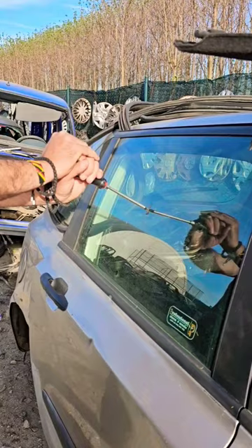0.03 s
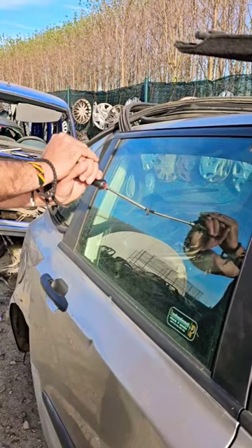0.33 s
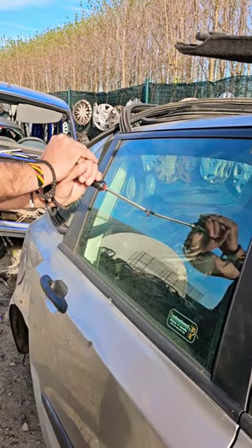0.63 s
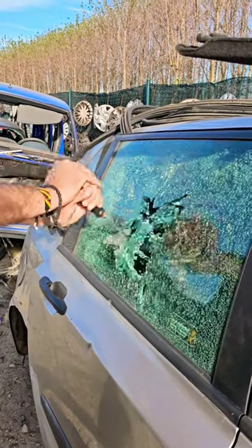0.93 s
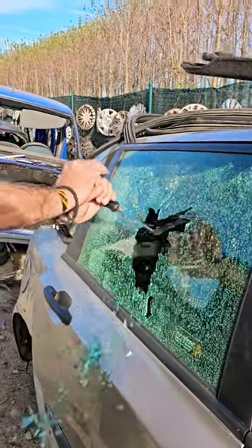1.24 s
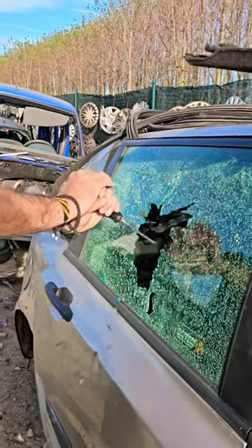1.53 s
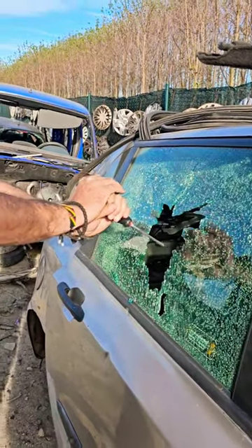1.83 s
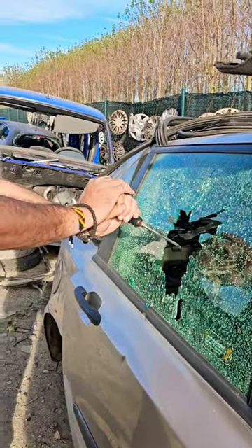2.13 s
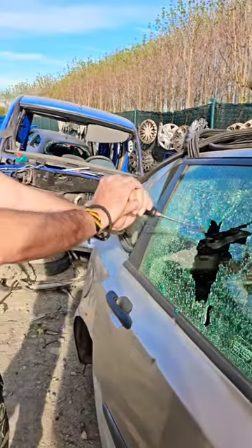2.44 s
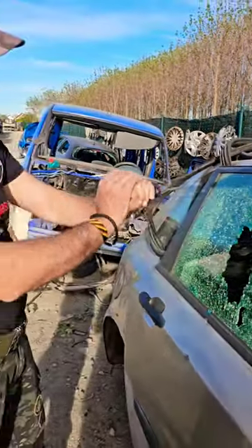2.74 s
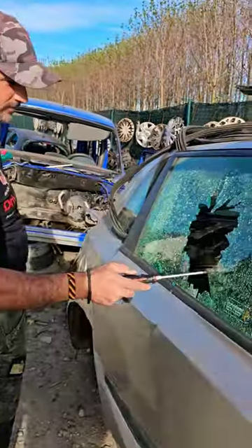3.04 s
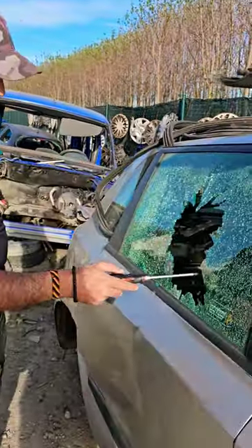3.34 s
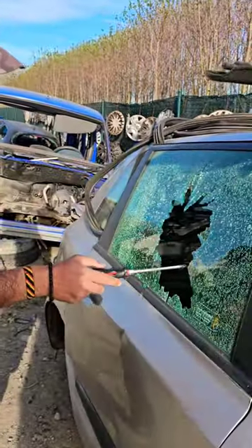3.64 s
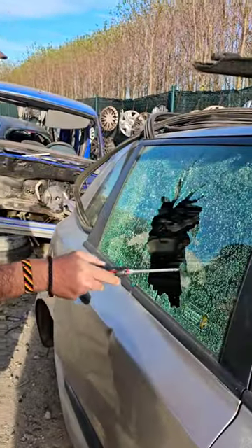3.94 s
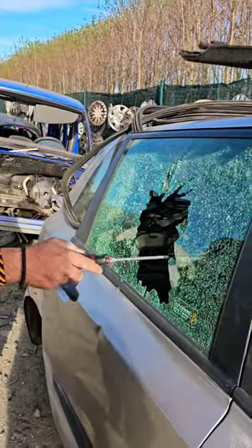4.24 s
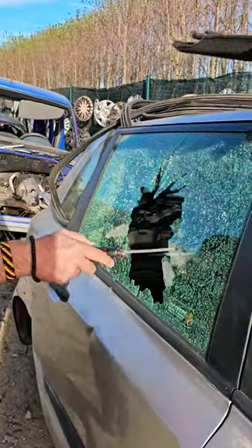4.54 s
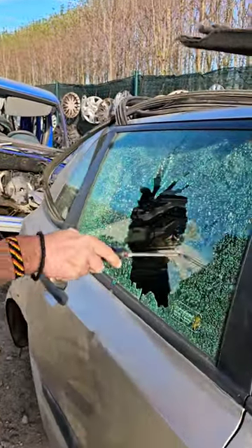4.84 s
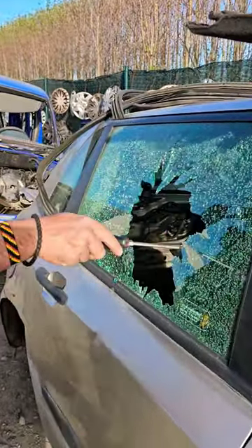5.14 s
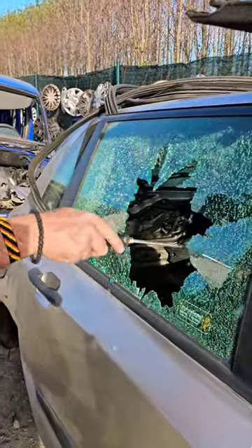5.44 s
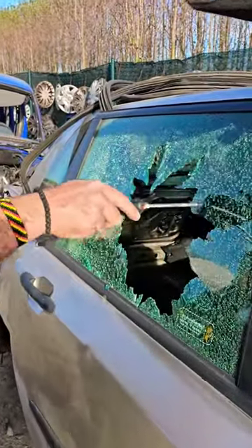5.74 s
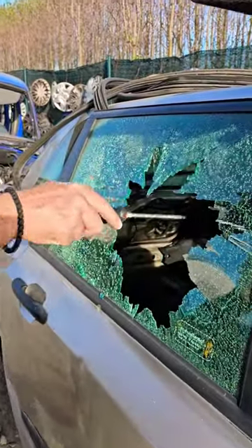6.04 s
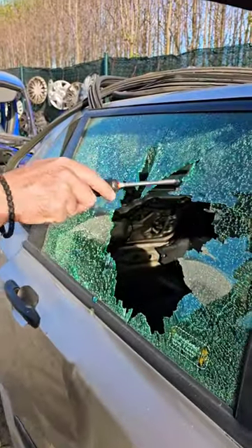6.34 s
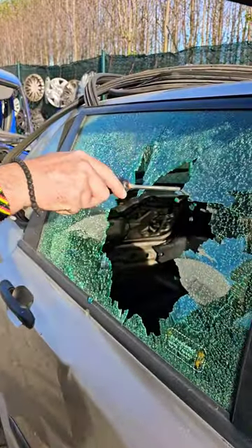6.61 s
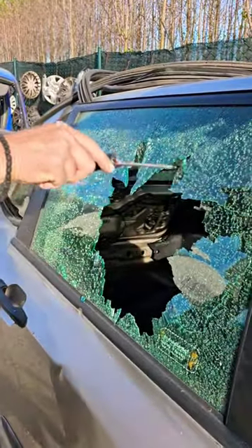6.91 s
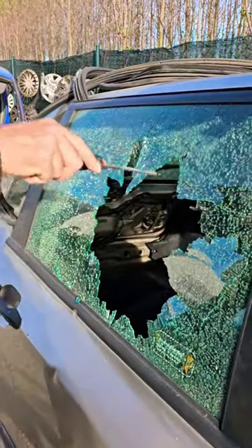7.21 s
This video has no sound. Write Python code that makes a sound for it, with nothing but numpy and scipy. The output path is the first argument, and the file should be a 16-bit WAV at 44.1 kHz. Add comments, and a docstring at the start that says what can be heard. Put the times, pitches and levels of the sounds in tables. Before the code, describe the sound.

Light wind rumbles on the microphone over a faint scrapyard hum. Close by, a car window suddenly cracks apart, the door rings dully and a rush of glass crumbs spills down, ending in a few bright ticks. The sound cuts out for an instant and pops back. A screwdriver then jabs repeatedly at the remaining glass, which snaps, crunches and trickles inside with small clunks.

```python
"""A car's toughened side window bursts under a screwdriver, outdoors in a humming scrapyard.
The pane's stored stress is released in one crack that sets the door's modes ringing, and crumbs of
glass pour down the door. The blade then pokes out more of the crazed pane: it clacks and snaps,
patches crunch loose, and chunks drop into the car. A light wind rumbles on the microphone.
The sound drops out once, briefly, and returns with a pop."""
import sys
import numpy as np
from scipy import signal
from scipy.fft import rfft, irfft
from scipy.io import wavfile
from scipy.ndimage import uniform_filter1d

SR = 44100
rng = np.random.default_rng(int(sys.argv[2]) if len(sys.argv) > 2 else 0)


def persist_wave(psi):
    """Save psi, clipped to +-1, as 16-bit WAV."""
    counts = np.round(np.clip(psi, -1, 1) * 32767).astype(np.int16)
    wavfile.write(sys.argv[1], SR, np.atleast_2d(counts).T)


N = 329427
T = np.arange(N) / SR
BURST_S = 0.8947
FLOW_RISE_S = 0.0092  # a shower of crumbs builds up this fast

# the blade pokes the pane: (time [s], clack level [dB], clack pitch [Hz], snap level [dB], snap pitch [Hz])
POKES = [(0.4986, -62, 1500, -52.5, 6210), (2.611, -38, 1250, -63, 4020), (3.15, -38.5, 1360, -63, 4000),
         (3.329, -28, 1042, -22, 4430), (3.806, -18, 1820, -35, 4000), (4.011, -25.5, 1406, -14.5, 6360),
         (4.568, -16.5, 1362, -18, 11570), (4.82, -23, 1420, -48, 3980), (4.9745, -12.5, 1320, -14, 7080),
         (5.264, -25.5, 1290, -39, 5940), (5.371, -18.5, 2642, -14, 11600), (5.913, -19, 1030, -14.5, 6100),
         (6.197, -29, 1306, -33, 13400), (6.345, -22, 1000, -47, 3984), (6.408, -11, 1580, -17, 4575),
         (7.098, -27, 1390, -18, 3830)]
# patches tear loose: (time [s], duration [s], crackle level [dB], grinding level [dB], upper cutoff [Hz])
CRUNCHES = [(0.883, 0.069, -30.5, -31, 16000), (0.947, 0.015, -24, -35, 16000),
            (0.984, 0.016, -12, -13.5, 13200), (1.005, 0.033, -16, -15, 13400),
            (1.097, 0.11, -17, -28.5, 11800), (1.128, 0.03, -27, -18.5, 14000),
            (1.59, 0.0085, -21.5, -25.5, 14900), (1.609, 0.043, -25.5, -61, 14100),
            (3.329, 0.046, -45, -50, 15000), (3.763, .023, -44, -48, 14100),
            (3.804, 0.029, -22.5, -25.5, 5200), (4.011, 0.047, -27, -34.5, 14800),
            (4.561, .027, -24, -38, 14600), (4.97, 0.051, -20, -30.5, 15960),
            (5.26, .012, -36, -35.5, 11900), (5.305, 0.018, -35.5, -43, 14600),
            (5.365, 0.014, -29.5, -27.5, 16000), (5.383, 0.054, -23.5, -32.5, 16000),
            (5.651, 0.011, -34.5, -56, 15000), (5.91, 0.05, -30, -35, 16000),
            (6.012, 0.023, -26.5, -35, 11200), (6.221, 0.014, -26, -26, 6000),
            (6.406, 0.013, -29, -15.5, 5800), (6.587, 0.098, -33, -41, 14900),
            (7.097, .023, -31, -31.5, 8100)]
# chunks land on the trim: (time [s], level [dB], pitch [Hz])
CHUNKS = [(1.292, -22.5, 560), (1.385, -20.5, 901), (1.455, -24, 676), (1.686, -22, 650), (1.795, -34, 790),
          (2.145, -39.5, 639), (2.715, -43, 576), (3.573, -37.5, 584), (4.46, -33.5, 676),
          (4.497, -28.5, 900), (4.734, -36, 593.4), (5.119, -26.5, 560), (5.287, -26, 537),
          (5.561, -26.5, 1050), (5.601, -36, 1170), (5.79, -34, 830), (5.83, -25, 759), (5.949, -13.5, 757),
          (6.134, -33.5, 750), (6.373, -27, 660), (6.61, -32, 418), (6.995, -31.5, 807),
          (7.024, -24.5, 670), (7.087, -31.5, 660), (7.283, -42, 1210)]
# spectrum of tinkling glass: (frequency [Hz], level [dB])
TINKLE_SPECTRUM = [(1060, -30.5), (1800, -1), (2010, -4.5), (2740, -2.5), (3950, -5.5), (4330, -2.5),
                   (6710, -4.5), (7290, 0.5), (10500, -15), (11500, -1), (13600, -8.5), (14900, -2.5),
                   (16000, -15.5)]


def from_db(db):
    """Decibels to amplitude ratio."""
    return 10 ** (np.asarray(db) / 20)


def rms_one(x):
    """Normalise to rms 1."""
    return x / np.sqrt(np.mean(x ** 2) + 1e-20)


def envelope(rows):
    """Gain interpolated through (time [s], level [dB]) points, silent outside their span."""
    return from_db(np.interp(T, *np.transpose(rows), left=-120, right=-120))


def add(out, s, sound):
    """Superpose a sound at time s."""
    at = int(round(s * SR))
    out[:, at:at + sound.shape[-1]] += sound[..., :N - at]


def swell(s, hold_s, rise_s, fall_s):
    """An envelope that rises at time s, holds and decays exponentially."""
    out, t = np.zeros((1, N)), T[:SR]
    add(out, s, (1 - np.exp(-t / rise_s)) * np.exp(-np.maximum(t - hold_s, 0) / fall_s))
    return out[0]


def cut(x, hz, kind):
    """Two-pole Butterworth low-pass or high-pass."""
    return signal.sosfilt(signal.butter(2, np.clip(hz, 20, .45 * SR), kind, fs=SR, output="sos"), x)


def coloured(x, spectrum, size=4096):
    """Minimum-phase filter with the given spectrum; white noise keeps its power."""
    hz, db = np.transpose(spectrum)
    log_f = np.log(np.maximum(np.fft.rfftfreq(size, 1 / SR), 1))
    beyond = np.maximum(np.log(hz[0]) - log_f, 0) + np.maximum(log_f - np.log(hz[-1]), 0)
    magnitude = from_db(np.interp(log_f, np.log(hz), db) - 20 * beyond)
    cepstrum = irfft(np.log(magnitude))
    cepstrum[1:size // 2] *= 2  # folding the cepstrum makes the filter causal
    cepstrum[size // 2 + 1:] = 0
    response = irfft(np.exp(rfft(cepstrum)))
    return signal.fftconvolve(x, response[None] / np.linalg.norm(response), axes=1)[:, :x.shape[1]]


def resonance(x, hz, width_hz):
    """Two-pole resonator with unit peak gain."""
    r = np.exp(-np.pi * width_hz / SR)
    gain = (1 - r * r) / 2
    return signal.lfilter([gain, 0, -gain], [1, -2 * r * np.cos(2 * np.pi * hz / SR), r * r], x + 1e-18)


def ring(hz, t60):
    """Free vibration of one damped mode."""
    t = T[:SR // 2]
    return np.sin(2 * np.pi * hz * t) * from_db(-60 * t / t60)


def stereo_noise(count, apart):
    """Partly coherent white noise; apart is the ratio of side to mid."""
    mid, side = rng.standard_normal((2, count))
    return mid + apart * side * [[1], [-1]]


def air(spectrum, apart):
    """Stationary coloured noise of rms 1."""
    return rms_one(coloured(stereo_noise(N, apart), spectrum))


def lurches(spread_db, size):
    """Log-normal amplitude modulation, smoothed over size samples."""
    drift = uniform_filter1d(uniform_filter1d(rng.standard_normal(N), size), size)
    return from_db(spread_db * rms_one(drift))


def evened(x, size=1500):
    """Hold the running rms near 1; the fine grain stays."""
    power = np.maximum(uniform_filter1d(np.mean(x ** 2, axis=0), size), 0)
    return x / np.sqrt(power + 1e-3 * np.mean(x ** 2))


def contacts(per_s, spread_db, lag_s=.0003):
    """A Poisson stream of uneven impulses, each placed by level and delay between the channels."""
    at = np.flatnonzero(rng.random(N) < per_s / SR)
    size = from_db(spread_db * np.minimum(rng.exponential(1, len(at)), 4)) * rng.choice([-1, 1], len(at))
    pan_db = rng.normal(0, 2, len(at))
    lag = (rng.normal(0, lag_s, len(at)) * SR).astype(int)
    out = np.zeros((2, N))
    out[0, at] = size * from_db(pan_db)
    out[1, np.clip(at + lag, 0, N - 1)] = size * from_db(-pan_db)
    return out


def door_echo(x, share):
    """Comb filtering: a reflection off the door skin interferes with the direct sound."""
    lags = (rng.uniform(.0003, .0016, 2) * SR).astype(int)
    echo = np.array([np.pad(side, (lag, 0))[:len(side)] for side, lag in zip(x, lags)])
    return (x + share * echo) / np.hypot(1, share)


def blow(hz, t60, breadth, apart):
    """An impact excites a crowd of damped modes around one pitch; peak 1."""
    t = T[:SR // 5]
    modes = stereo_noise(len(t), apart) * from_db(-60 * t / t60)
    modes = resonance(resonance(modes, hz, breadth * hz), hz, 2 * breadth * hz)
    return modes / np.abs(modes).max()


def fracture(hz, decay_s, breadth, low_hz):
    """Brittle fracture: a sharp onset and a short shiver of the surrounding glass; peak +2 dB."""
    t = T[:SR // 12]
    decay = np.exp(-t / decay_s) + from_db(-27) * np.exp(-t / .005)
    shiver = resonance(rng.standard_normal((2, len(t))) * decay, hz, breadth * hz)
    snap = door_echo(cut(shiver, low_hz, "high"), share=.17)
    return from_db(2) * snap / np.abs(snap).max(axis=1, keepdims=True)


def wind():
    """Turbulent pressure buffets the microphone; the door heaves at the burst and adds its own puff."""
    # strength of the breeze: (time [s], level [dB])
    strength = [(0.13, -42), (0.6, -36.5), (1.5, -40), (2.1, -46.5), (2.6, -41.5), (3.9, -37),
                (4.75, -43.5), (5.6, -39), (6.3, -46), (7.47, -39)]
    # the strongest gusts: (time [s], level [dB])
    gusts = [(0.64, -32.5), (1.44, -32), (2.48, -36.5), (2.72, -35), (3.11, -36.5), (3.49, -33), (3.7, -34),
             (4.13, -34), (4.42, -32.5), (4.87, -31), (5.12, -29.5), (5.46, -29.5), (6.66, -31.5),
             (7.38, -28)]
    # spectrum of the turbulence: (frequency [Hz], level [dB])
    spectrum = [(15, -1.5), (30, -6), (50, 4), (80, 0.5), (110, -5), (160, -15), (250, -23.5), (400, -35),
                (800, -49)]
    breeze = envelope(strength) * lurches(3, size=int(.027 * SR))
    puffs = sum(from_db(db) * swell(s, hold_s=.045, rise_s=.0089, fall_s=.039) for s, db in gusts)
    heave = from_db(-24.5) * swell(BURST_S, hold_s=.11, rise_s=.005, fall_s=.034)
    return np.hypot(breeze, puffs + heave) * evened(air(spectrum, apart=.38), size=3000)


def yard():
    """Ambient noise: the far, steady hum of the yard."""
    # spectrum of the hum: (frequency [Hz], level [dB])
    spectrum = [(100, -3), (300, 1), (600, -3), (1200, -13.5), (2200, -29), (4000, -37), (7500, -37.5),
                (10000, -48), (16000, -45)]
    return from_db(-61) * air(spectrum, apart=.84)


def blade_pokes():
    """Each poke is a heavily damped impact, a dry clack, with a brittle snap in the pane."""
    out = np.zeros((2, N))
    for s, clack_db, clack_hz, snap_db, snap_hz in POKES:
        clack = cut(blow(clack_hz, t60=.01, breadth=.67, apart=.71), 1963, "low")
        add(out, s, from_db(clack_db + 3) * clack)
        add(out, s, from_db(snap_db) * fracture(snap_hz, decay_s=.0021, breadth=.7, low_hz=900))
    return out


def door_thuds(rise_s=.008, fall_s=.035):
    """Forced response: the hollow door answers each crunch and fallen chunk with a dull thud."""
    # spectrum of a thud: (frequency [Hz], level [dB])
    spectrum = [(50, -8.5), (85, -1), (130, 0), (200, -2), (280, -4), (420, -17)]
    shoves = [from_db(db - 17.5) * swell(s, length, rise_s, fall_s) for s, length, db, _, _ in CRUNCHES]
    falls = [from_db(db - 17) * swell(s, 0, rise_s, fall_s) for s, db, _ in CHUNKS]
    return sum(shoves + falls) * evened(air(spectrum, apart=.3))


def crunches(rise_s=.002, release_s=.0064, fade_db=6, centre_hz=2616):
    """Crack propagation and friction: a patch's cubes crackle and grind until it is free."""
    # spectrum of the cracking: (frequency [Hz], level [dB])
    crackle_spectrum = [(1060, -34.5), (1800, -14.5), (2010, -9.5), (2790, -10.5), (4020, -4), (4410, -4),
                        (5060, -3.5), (7290, -2), (10100, -8), (14900, 2.5), (16000, -15.5)]
    # spectrum of cubes rubbing: (frequency [Hz], level [dB])
    grind_spectrum = [(180, -40.5), (300, -12), (394, -0.5), (620, -6), (870, -7.5), (986, -15.5),
                      (1160, -5), (1680, -13.5), (2890, -10.5), (3510, -19.5), (4500, -17.5), (5850, -43),
                      (9900, -120)]
    cracks = evened(contacts(per_s=9000, spread_db=5), size=700)
    crackle = coloured(cracks, crackle_spectrum) * lurches(1, size=130)
    grind = evened(coloured(contacts(per_s=3000, spread_db=4, lag_s=.0004), grind_spectrum), size=700)
    out, t = np.zeros((2, N)), T[:SR // 4]
    for s, length, crackle_db, grind_db, high_hz in CRUNCHES:
        now = np.minimum(int(s * SR) + np.arange(len(t)), N - 1)
        force = (1 - np.exp(-t / rise_s)) * from_db(-fade_db * np.minimum(t / length, 1))
        force *= np.exp(-np.maximum(t - length, 0) / release_s)
        patch = force * (from_db(crackle_db) * crackle[:, now] + from_db(grind_db) * grind[:, now])
        # a clean break is broad, a blunt shove narrows the band from both ends
        low_hz = centre_hz ** 2 / high_hz
        patch = cut(cut(patch, low_hz, "high"), high_hz, "low")
        add(out, s + rise_s, door_echo(patch, share=.55))
    return out


def burst(crack_s=.00017, shiver_s=.002):
    """Stress release: the pane lets go in one pressure spike that kicks the door."""
    out, t = np.zeros((2, N)), T[:SR // 20]
    spike = (1 - t / crack_s) * np.exp(-t / crack_s)
    shiver = from_db(-9) * cut(stereo_noise(len(t), apart=.96) * np.exp(-t / shiver_s), 6000, "high")
    add(out, BURST_S, from_db(-2.5) * (spike + shiver))
    add(out, BURST_S, from_db(-16.5) * door_response())
    return out


def door_response():
    """Modal superposition: the door's impulse response is the sum of its damped modes."""
    # modes of the panel and its cavity: (frequency [Hz], level [dB], t60 [s])
    modes = [(78, -6.5, 0.41), (113, -10, 0.11), (165, -3, .16), (207.6, 1, 0.15), (235.6, -1, 0.17),
             (267.5, -3, 0.16), (291, -10, 0.16), (454.4, -11.5, 0.24), (642.6, -4.5, 0.12),
             (720, -15.5, 0.045), (784, -7, 0.12), (1040, -5.5, 0.011), (1275, 10.5, 0.017),
             (1790, 2, 0.0099)]
    return sum(from_db(db) * ring(hz, t60) for hz, db, t60 in modes)


def crazing(per_s=10, shiver_s=.00069):
    """Acoustic emission: the cracked pane ticks faintly as it settles."""
    t = T[:SR // 50]
    shiver = rng.standard_normal((2, len(t))) * np.exp(-t / shiver_s)
    shiver /= np.abs(shiver).max()
    ticks = signal.fftconvolve(contacts(per_s, spread_db=2.5), shiver, axes=1)[:, :N]
    return from_db(-61) * (T > BURST_S) * coloured(ticks, TINKLE_SPECTRUM)


def booms(rise_cycles=.38):
    """A soft impact excites one damped mode; the lower the note, the slower it swells."""
    # soft, heavy bumps: (time [s], level [dB], frequency [Hz], t60 [s])
    bumps = [(0.903, -14, 220, 0.12), (0.900, -24, 168, 0.17), (0.986, -12.5, 770, 0.083),
             (1.010, -13.5, 634, 0.12), (1.14, -16, 232, 0.21), (1.291, -27, 278.2, 0.088),
             (4.215, -9, 64.7, 0.088), (5.948, -18.5, 611, 0.061)]
    out = np.zeros((2, N))
    for s, db, hz, t60 in bumps:
        onset = 1 - np.exp(-T[:SR // 2] * hz / rise_cycles)
        add(out, s, from_db(db) * ring(hz, t60) * onset)
    return out


def chinks(t60=.028, count=400):
    """Bigger cubes ring briefly, each at its own natural frequency."""
    out = np.zeros((2, N))
    for k, (wait, pitch, strength, bearing) in enumerate(rng.random((count, 4))):
        note = from_db(12 * strength) * ring(2600 + 9000 * pitch, t60)[:SR // 20]
        add(out, T[-1] * (k + wait) / count, note * np.array([[bearing], [1 - bearing]]))
    return rms_one(out)


def crumbs(per_s):
    """Shot noise of colliding cubes: a clumpy rush of fine clicks, with bigger ticks and chinks."""
    rush = evened(contacts(per_s, spread_db=-3)) * lurches(3, size=260)
    ticks = door_echo(rms_one(contacts(per_s=70, spread_db=3.5)), share=1)
    return evened(rush + from_db(-2) * ticks + from_db(-11) * chinks(), size=2200)


def flow_inside():
    """Incoherent sources add in power: a trickle, showers after crunches and spills into the car."""
    # loose crumbs trickle while the hole widens: (time [s], level [dB])
    trickle_levels = [(3.3, -78.5), (3.9, -72), (4.4, -75.5), (5.2, -64.5), (5.85, -53.5), (6.25, -61),
                      (6.6, -58.5), (6.9, -75.5), (7.47, -68)]
    # clumps slide off the edge of the hole: (time [s], duration [s], level [dB])
    slides = [(3.439, .08, -65.5), (3.92, 0.076, -53.5), (4.08, .03, -52.5), (4.288, .07, -58.5),
              (4.471, .08, -61.5), (4.645, .07, -55), (5.05, .07, -50.5), (5.534, 0.14, -47.5),
              (5.8, .05, -51.5), (6.061, .04, -60), (6.467, .1, -46), (6.725, .04, -55.5),
              (6.983, .045, -55.5), (7.129, 0.031, -54), (7.228, .04, -65.5), (7.36, .05, -64)]
    trickle = envelope(trickle_levels) * lurches(3.5, size=int(.015 * SR))
    showers = [from_db(db - 23) * swell(s, length, FLOW_RISE_S, fall_s=.055)
               for s, length, db, _, _ in CRUNCHES]
    spills = [from_db(db) * swell(s, length, FLOW_RISE_S, fall_s=.02) for s, length, db in slides]
    return np.sqrt(sum(part ** 2 for part in [trickle] + showers + spills))


def falling_glass(full_flow_db=-28, drum_exponent=.76):
    """Granular flow: crumbs tinkle against each other, patter on the trim and drum on the door."""
    # the burst pane pours down the door and drains away: (time [s], level [dB])
    pour = [(0.9, -33), (1.07, -31), (1.15, -26), (1.55, -38), (1.68, -38), (1.76, -47), (2.15, -61),
            (2.35, -79), (2.93, -84)]
    # spectrum of crumbs striking the trim: (frequency [Hz], level [dB])
    patter_spectrum = [(210, -26), (350, 1.5), (567, 1.5), (771, 4.5), (1020, -9.5), (1290, 5.5),
                       (1590, -9.5), (1770, -4.5), (3500, -15.5), (4550, -46), (7700, -120)]
    # weighting of the door's drumming: (frequency [Hz], level [dB])
    drum_spectrum = [(120, -11.5), (230, .5), (400, 4), (600, -1), (1200, -15.5)]
    outside, inside = envelope(pour), flow_inside()
    # every chunk scatters crumbs where it lands
    scatter = sum(from_db(db - 19) * swell(s, 0, FLOW_RISE_S, fall_s=.04) for s, db, _ in CHUNKS)
    patter_gain = from_db(-7) * outside + from_db(-.5) * inside + scatter
    pane_rattle = from_db(-19) * swell(BURST_S, 0, rise_s=.00098, fall_s=.018)
    drum_gain = from_db(-12) * patter_gain ** drum_exponent + pane_rattle
    # a thin trickle is grainy, a full pour merges into a rush
    flow = np.minimum((outside + inside) / from_db(full_flow_db), 1)
    tinkle = coloured(crumbs(per_s=1500 + 6000 * flow), TINKLE_SPECTRUM)
    # the pane screens the crumbs that fall inside the car
    tinkle = outside * tinkle + inside * cut(tinkle, 13500, "low")
    landings = contacts(per_s=1100, spread_db=3.5, lag_s=.00025)
    patter = evened(coloured(landings, patter_spectrum))
    drum = signal.fftconvolve(landings, door_response()[None], axes=1)[:, :N]
    drum = evened(coloured(drum, drum_spectrum))
    return from_db(1.5) * tinkle + patter_gain * patter + drum_gain * drum


def chunks(rebound_s=.013, loss_db=9):
    """Inelastic collision: a chunk clunks on the trim and rebounds twice, weaker each time."""
    out = np.zeros((2, N))
    for s, db, hz in CHUNKS:
        for touch, unevenness in enumerate(rng.uniform(.75, 1.25, 3)):
            clunk = blow(hz, t60=.055, breadth=.51, apart=.7)
            add(out, s + touch * unevenness * rebound_s, from_db(db - touch * loss_db) * clunk)
    return out


def slivers():
    """Free vibration: a long, bouncing splinter rings on one clear note."""
    # splinters bounce free: (time [s], frequency [Hz], level [dB], t60 [s])
    bounces = [(1.504, 7700, -33, 0.14), (1.810, 12250, -35.5, 0.11), (2.079, 11100, -39.5, 0.093),
               (2.078, 8400, -46, 0.19), (6.432, 7370, -39, 0.12), (6.497, 7360, -40, 0.2),
               (6.553, 7330, -27, 0.056)]
    out = np.zeros((2, N))
    for s, hz, db, t60 in bounces:
        add(out, s, from_db(db) * ring(hz, t60))
    return out


def shards():
    """Impact fracture: the largest shards snap brightly as they hit something hard."""
    # shards land: (time [s], level [dB], pitch [Hz])
    landings = [(1.595, -16, 5100), (1.6234, -13.5, 7040), (1.7418, -28, 10990), (1.8817, -30, 5200),
                (1.903, -12.5, 6400), (1.947, -27.5, 7150), (2.0101, -25, 9000), (2.078, -30.5, 9070),
                (2.1756, -40, 12960), (2.268, -40, 7130), (2.4278, -51, 13300), (2.8744, -43.5, 13300),
                (3.449, -42, 7900), (3.5163, -41, 6750), (3.665, -36, 7620), (4.294, -39, 4440),
                (4.7768, -39.5, 7130), (4.93, -46, 7400), (5.66, -23.5, 7360), (5.7478, -28.5, 6950),
                (5.799, -34, 7050), (6.1134, -34, 5870), (6.8054, -34, 7200)]
    out = np.zeros((2, N))
    for s, db, hz in landings:
        add(out, s, from_db(db) * fracture(hz, decay_s=.0024, breadth=.5, low_hz=2990))
    return out


def cabin(x, t60=.12, wet_db=-9):
    """Reverberation: dense, short reflections from the car's body and interior."""
    t = T[:SR // 4]
    response = rng.standard_normal((2, len(t))) * from_db(-60 * t / t60) * (t > .002)
    response /= np.linalg.norm(response, axis=1, keepdims=True)
    return x + from_db(wet_db) * signal.fftconvolve(x, response, axes=1)[:, :N]


def scene():
    """Superposition: glass and door close by, placed by level panning, with wind and yard behind."""
    # direction of the breaking glass: (time [s], left minus right level [dB])
    bearing = [(0.9, -1), (1.9, -2.5), (3.3, -1), (4.95, -2), (5.3, 0.5), (5.95, -1), (6.3, -0.5),
               (6.6, 0.5), (7.1, 0.5)]
    pan_db = np.interp(T, *np.transpose(bearing))
    outdoors = wind() + yard()
    breaking = blade_pokes() + door_thuds() + crunches() + burst() + crazing() + booms()
    debris = falling_glass() + chunks() + slivers() + shards()
    return cabin(breaking + debris) * from_db(pan_db * [[.5], [-.5]]) + outdoors * from_db([[-.7], [.7]])


def record(dry, pop_db=-20, ceiling=.8, cutoff_hz=15900):
    """Gating, soft clipping and a low-pass: the sound opens late, drops out once and pops back."""
    # spans of silence: (start [s], end [s])
    silences = [(-1, 0.125), (2.932, 2.9945)]
    gate = np.ones(N)
    for start, end in silences:
        gate[(T > start) & (T < end)] = from_db(-70)
    out = dry * uniform_filter1d(gate, size=60)
    click = np.exp(-T[:SR // 2] / .00014)
    add(out, silences[1][1], from_db(pop_db) * (click - ring(hz=80, t60=.065)))
    out = ceiling * np.tanh(out / ceiling)
    return signal.sosfilt(signal.cheby1(12, .2, cutoff_hz, fs=SR, output="sos"), out)


dry = scene()
out = record(dry)
persist_wave(out)
```